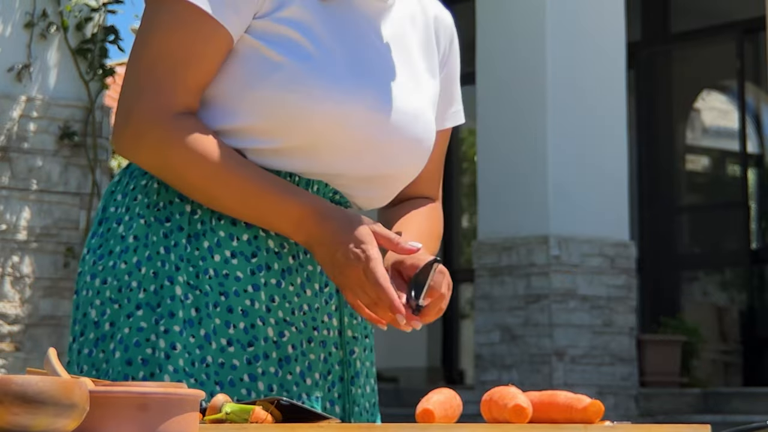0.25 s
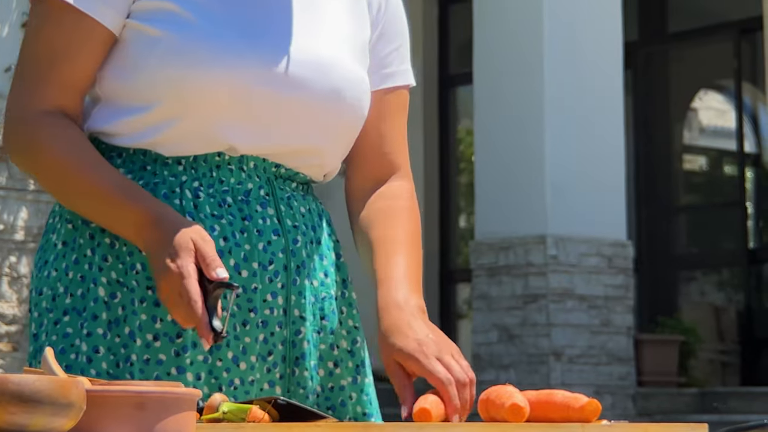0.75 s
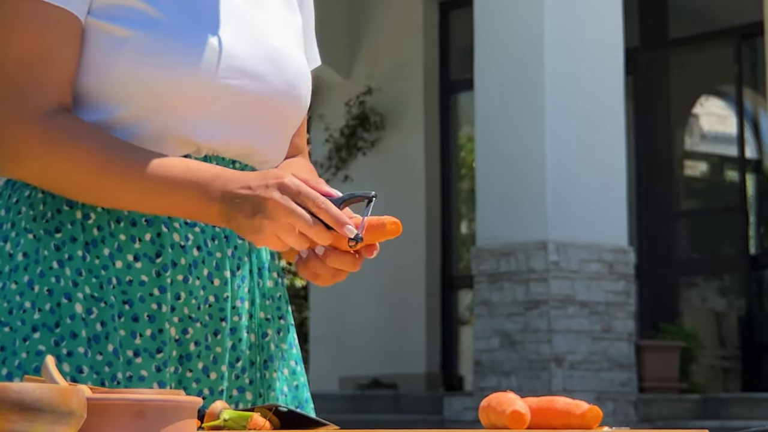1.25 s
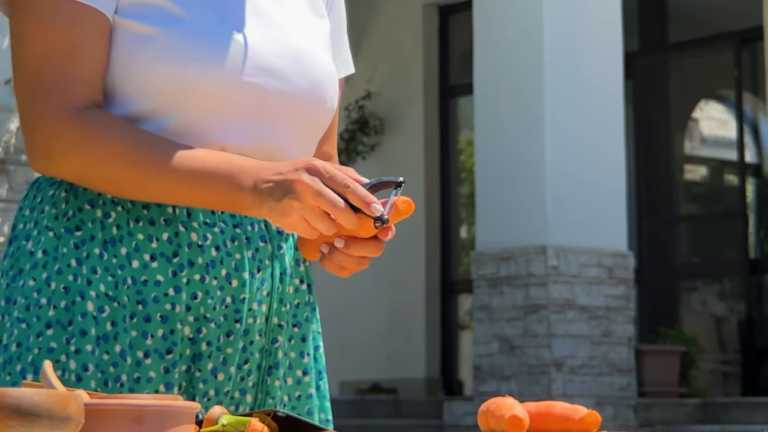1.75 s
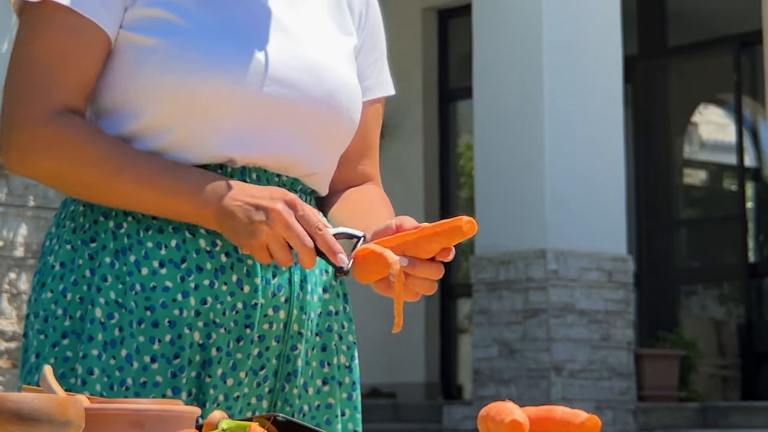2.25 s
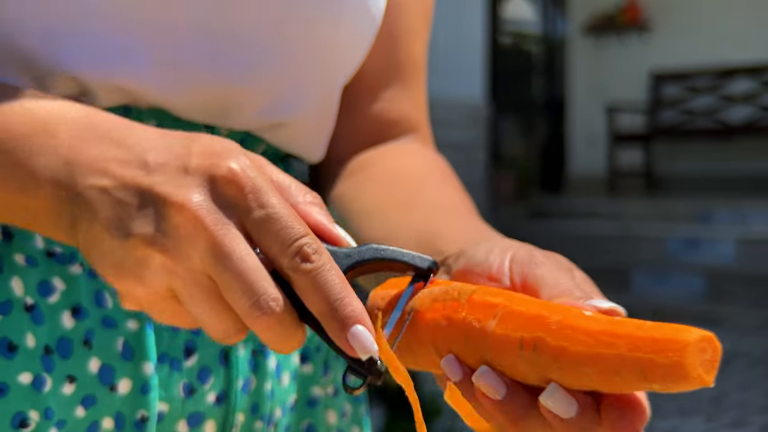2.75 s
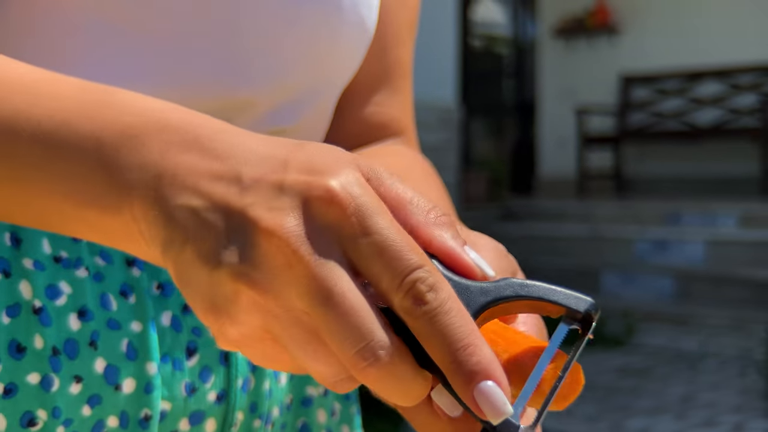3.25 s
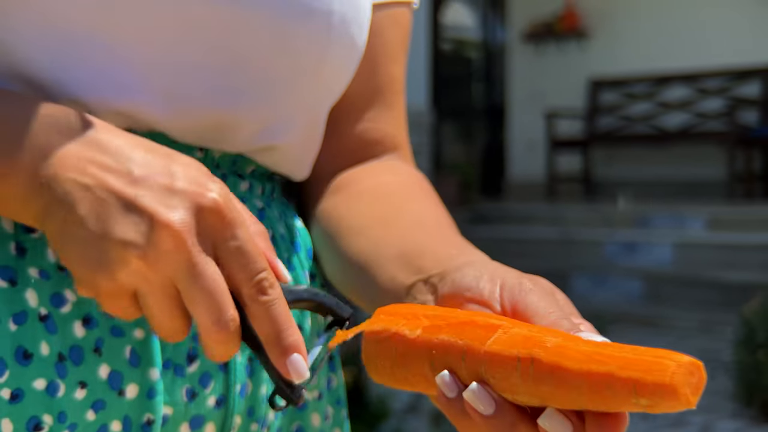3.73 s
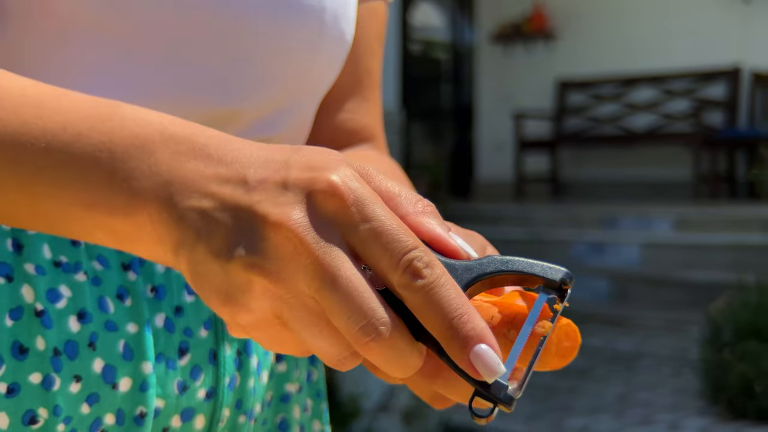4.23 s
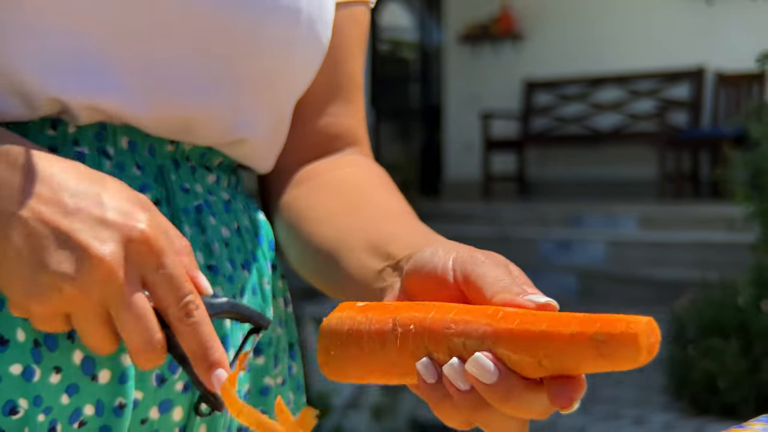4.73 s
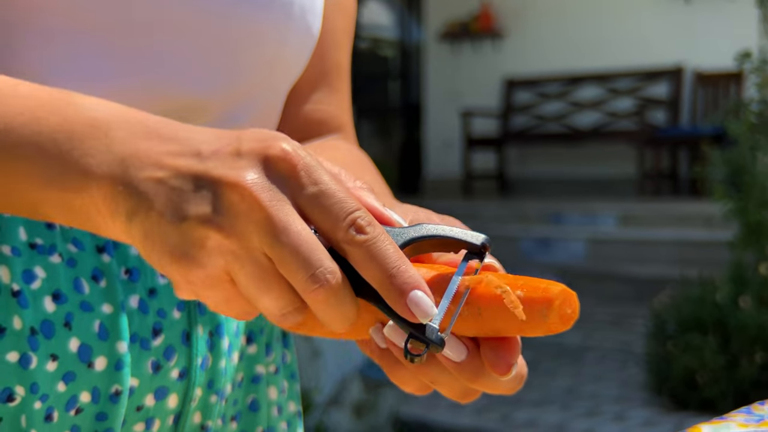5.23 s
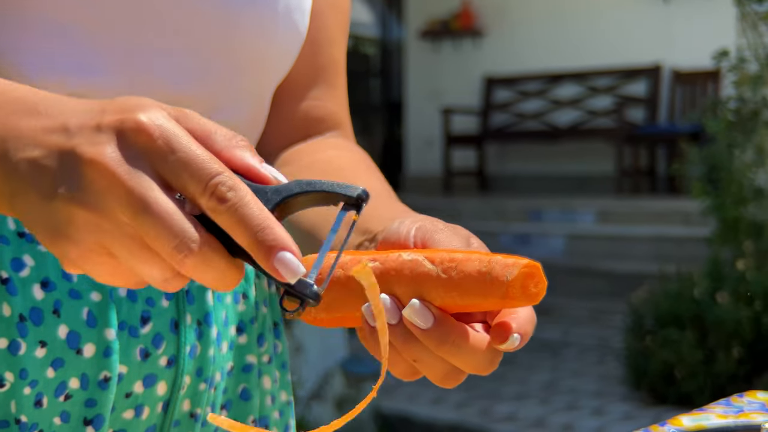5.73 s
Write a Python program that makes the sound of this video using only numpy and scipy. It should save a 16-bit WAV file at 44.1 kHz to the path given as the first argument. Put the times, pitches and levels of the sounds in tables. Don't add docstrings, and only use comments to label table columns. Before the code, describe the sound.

Crisp, dry scrapes of a swivel peeler on a carrot with sharp plastic and metal clacks, after low wind buffeting and distant twitters in open air.

```python
import sys
import numpy as np
from scipy import signal
from scipy.io import wavfile
from scipy.ndimage import uniform_filter1d

SR = 44100
rng = np.random.default_rng(int(sys.argv[2]) if len(sys.argv) > 2 else 0)


def linear_from_db(decibels):
    return 10 ** (np.asarray(decibels, float) / 20)


def dump(signal):
    limited = np.clip(np.atleast_2d(signal).T, -1, 1)
    pcm = np.round(limited * 32767).astype(np.int16)
    wavfile.write(sys.argv[1], SR, pcm)


N = 263718


def rms_one(x):
    return x / np.sqrt(np.mean(x ** 2) + 1e-20)


def in_time(tables, silent_db=-130):
    t, out = np.arange(N) / SR, None
    for rows in tables:
        s, *columns = np.transpose(rows)
        curves = np.array([np.interp(t, s, c) for c in columns])
        inside = (t >= s[0]) & (t <= s[-1])
        out = np.where(inside, curves, silent_db if out is None else out)
    return out


def drift(rate_hz):
    r = np.exp(-80 * np.pi * rate_hz / SR)
    slow = signal.lfilter([1], [1, -2 * r, r * r], rng.standard_normal(N // 40 + 2002))[2000:]
    return np.interp(np.arange(N) / 40, np.arange(len(slow)), rms_one(slow))


def band(x, low_hz, high_hz, order=2):
    edges = [low_hz, min(high_hz, .45 * SR)]
    return signal.sosfilt(signal.butter(order, edges, "band", fs=SR, output="sos"), x)


def resonate(x, hz, width_hz):
    r = np.exp(-np.pi * width_hz / SR)
    top = np.array([1, 0, -1]) * (1 - r * r) / 2
    return signal.lfilter(top, [1, -2 * r * np.cos(2 * np.pi * hz / SR), r * r], x + 1e-18)


def modes_rms(modes):
    return np.sqrt(sum(linear_from_db(2 * db) * np.pi * w / SR for hz, w, db in modes))


def body(x, modes, wander_db):
    out = 0
    for k, (hz, w, db) in enumerate(modes):
        out = out + (-1) ** k * linear_from_db(db + wander_db * drift(12)) * resonate(x, hz, w)
    return out / modes_rms(modes)


def slide(x, modes, bend, wander_db):
    out = 0
    for k, (hz, w, db) in enumerate(modes):
        moving_hz = hz * (bend + 0.019 * drift(8.2))
        turn = np.exp(2j * np.pi * np.cumsum(moving_hz) / SR)
        r = np.exp(-1.5 * np.pi * w / SR)
        rung = turn * signal.lfilter([(1 - r) ** 2], [1, -2 * r, r * r], x / turn)
        out = out + (-1) ** k * linear_from_db(db + wander_db * drift(21)) * 2 * rung.real
    return out / modes_rms(modes)


# f/Hz, level/dB (per Hz)
AIR_COLOUR = [(140, -9), (400, -11.5), (800, -13.5), (1140, -18), (2280, -25), (4500, -28), (9000, -35),
              (12900, -38)]
# f/Hz, width/Hz, level/dB (relative)
DRONES = [(50.7, 17, -4), (124.2, 12, -11.5), (170.7, 3.8, -25), (292, 39, -20)]
HUSH_DB, HUSH_FADE_DB_PER_S = -68, 0.22


def hush():
    out, edges, white = 0, 120 * 2 ** np.arange(0, 7.6, .5), rng.standard_normal((2, N))
    hz, db = np.transpose(AIR_COLOUR)
    for k, (low, high) in enumerate(zip(edges, edges[1:])):
        level_db = np.interp(np.log(low * high) / 2, np.log(hz), db) + 2.5 * drift(2.6)
        out = out + linear_from_db(level_db) * band(white[k % 2], low, high)
    out = rms_one(out)
    for hz, w, db in DRONES:
        out = out + linear_from_db(db) * rms_one(resonate(resonate(white[0], hz, w), hz, 2 * w))
    out = signal.sosfilt(signal.ellip(8, .5, 40, 12800, fs=SR, output="sos"), out)
    for low in (12900, 13600, 14300, 15000):
        flicker = uniform_filter1d(1. * (drift(9) > low / 14000 - .3), 400)
        out = out + linear_from_db(-28.5) * flicker * rms_one(band(white[1], low, low + 700, order=4))
    t = np.arange(N) / SR
    gust = 1 + 0.53 * np.exp(-t / 0.0064)
    return linear_from_db(HUSH_DB - HUSH_FADE_DB_PER_S * t) * gust * out


# t/s, level/dB
GUSTS = [
    [(0.0, -48.5), (0.386, -37), (0.406, -31.5), (0.664, -47.5), (0.832, -46.5), (0.9, -43.5),
     (1.072, -44.5), (1.168, -44.5), (1.25, -52)],
    [(1.25, -62.5), (1.374, -47.5), (1.714, -54.5), (1.898, -54.5), (2.028, -50), (2.184, -41), (2.37, -50),
     (2.416, -47), (2.62, -55)],
    [(5.2, -72), (5.3, -63), (5.38, -73), (5.47, -66), (5.54, -64)],
]
BUFFET_DB, BUFFET_FOLLOWS = 17, 1
QUIET_DB, QUIET_BUFFET_DB, QUIET_SURGE_DB = -65, -46.5, -7
START_PUSH_DB, START_PUSH_S = -31, 0.03


def wind():
    t, first_db = np.arange(N) / SR, GUSTS[0][0][1]
    rumble_db = uniform_filter1d(in_time(GUSTS, silent_db=QUIET_DB)[0], size=2000)
    buffet_db = BUFFET_DB + first_db + BUFFET_FOLLOWS * (rumble_db - first_db)
    buffet_db = np.maximum(buffet_db, QUIET_BUFFET_DB)
    white = rng.standard_normal((4, N + SR))
    buffet = rms_one(band(white[0], 2.914, 11.5, order=3)[SR:])
    rumble = rms_one(band(white[1], 28, 62.3)[SR:])
    flutter = rms_one(band(white[2], 29, 148)[SR:]) * linear_from_db(0.5 * drift(36))
    surge = rms_one(band(white[3], 9.6, 28)[SR:])
    rumble = rumble / np.sqrt(uniform_filter1d(rumble ** 2, 3000) + 2)
    buffet = buffet / np.sqrt(uniform_filter1d(buffet ** 2, 9000) + 0.72)
    push = linear_from_db(START_PUSH_DB) * np.exp(-t / START_PUSH_S)
    surge = linear_from_db(QUIET_SURGE_DB * (t > GUSTS[1][-1][0])) * surge
    fast = linear_from_db(-13) * rumble + surge + linear_from_db(-23.5) * flutter
    return push + linear_from_db(buffet_db - 0.7) * buffet + linear_from_db(rumble_db + 2.5 * drift(7.4)) * fast


PHRASE_PEAK, PHRASE_IN_DB, PHRASE_OUT_DB = .4, -5, -7


def phrase(s, length, start_hz, end_hz, db):
    peak_hz = start_hz + PHRASE_PEAK * (end_hz - start_hz)
    return [(s, start_hz, db + PHRASE_IN_DB),
            (s + PHRASE_PEAK * length, peak_hz, db),
            (s + length, end_hz, db + PHRASE_OUT_DB)]


BIRD_FAR_DB = 4


def bird(rows, trill_db, blur_hz):
    hz, level_db = in_time([phrase(*row) for row in rows])
    hz = uniform_filter1d(np.maximum(hz, 2000), 100) * (1 + 0.047 * drift(62))
    phase = 2 * np.pi * np.cumsum(hz) / SR
    tone = drift(blur_hz) * np.sin(phase) + drift(blur_hz) * np.cos(phase)
    song = uniform_filter1d(linear_from_db(level_db - BIRD_FAR_DB), 600) * linear_from_db(trill_db * drift(23)) * tone
    lags = (SR * np.array([.011, .027, .048, .081, .12])).astype(int)
    return song + sum(linear_from_db(-5 - 2.5 * k) * np.roll(song, lag) for k, lag in enumerate(lags))


# t/s, length/s, start f/Hz, end f/Hz, level/dB
HIGH_BIRD = [
    (.32, 0.2, 5810, 5120, -72.5),
    (.85, 0.22, 5760, 5390, -72.5),
    (1.3, 0.21, 6080, 5010, -73),
    (1.75, .06, 6000, 5600, -77.5),
    (2.42, .12, 5900, 5400, -74.5),
    (3.89, 0.15, 6000, 5730, -71.5),
    (4.045, .03, 5240, 5600, -65.5),
    (4.145, .025, 5150, 5230, -67),
    (4.735, .055, 6300, 5250, -66),
    (4.86, 0.078, 5250, 4760, -70),
]
LOW_BIRD = [
    (.2, 0.085, 3590, 2920, -72),
    (.355, 0.046, 4410, 4310, -68),
    (1.05, 0.16, 3860, 2855, -70.5),
    (4.085, 0.068, 3100, 3050, -64.5),
]


def birds():
    return bird(HIGH_BIRD, trill_db=4, blur_hz=200) + linear_from_db(-3) * bird(LOW_BIRD, trill_db=3, blur_hz=250)


# t/s, length/s, start f/Hz, end f/Hz, level/dB
CHIRPS = [
    (2.385, 0.033, 4200, 2800, -71),
    (2.4, 0.0062, 2200, 5700, -74),
    (2.412, 0.014, 5200, 1900, -67),
    (3.925, 0.017, 4900, 9200, -75),
    (3.94, 0.021, 2900, 6900, -70),
    (4.035, 0.039, 1800, 5500, -74.5),
    (4.03, 0.011, 4900, 6800, -78),
    (4.07, 0.013, 4100, 3600, -72),
    (0.28, .03, 3000, 3600, -90),
]


def chirps():
    out = np.zeros(N)
    for s, length, start_hz, end_hz, db in CHIRPS:
        i, size = round(s * SR), round(length * SR)
        phase = 2 * np.pi * np.cumsum(np.linspace(start_hz, end_hz, size)) / SR
        out[i:i + size] += linear_from_db(db) * np.hanning(size) ** .5 * np.sin(phase)
    return out * linear_from_db(3.7 * drift(150))


# t/s, peak level/dB, f/Hz, click level/dB, thud level/dB (both relative)
BUMPS = [
    (0.767, -54, 1030, 2, -10),
    (0.772, -51.5, 940, -25, -3),
    (0.776, -54.5, 426, -19, -28),
    (0.779, -53, 970, -19, -13),
    (0.787, -55.5, 966, -15, -22),
    (2.857, -65, 570, 29, -1),
    (4.212, -61, 970, -7, -4),
    (4.825, -61, 566, -9, 4),
    (5.761, -60.5, 1300, -7, -18),
]
BUMP_T60_S = 0.025


def bumps():
    out, t = np.zeros(N + 4000), np.arange(4000) / SR
    rough = rng.standard_normal((len(BUMPS), 4000))
    for (s, peak_db, hz, click_db, thud_db), noise in zip(BUMPS, rough):
        thump = 2 * np.sin(2 * np.pi * hz * t) + 0.46 * rms_one(band(noise, .5 * hz, 2 * hz, order=1))
        click = linear_from_db(click_db - 60 * t / 0.0022) * rms_one(band(noise, 650, 3200))
        thud = linear_from_db(thud_db + 30 * t / BUMP_T60_S) * np.sin(2 * np.pi * 300 * t)
        fade = linear_from_db(peak_db - 60 * t / BUMP_T60_S) * np.minimum(t / 0.00042, 1)
        i = round(s * SR)
        out[i:i + 4000] += fade * (thump + click + thud)
    return out[:N]


# t/s, f/Hz, level/dB, t60/s
SINGING = [
    (.603, 12800, -84, .25),
    (2.343, 13000, -79, .25),
    (3.010, 13700, -64, 0.27),
    (3.010, 11500, -73, 0.18),
    (4.812, 12700, -61, 0.13),
    (5.545, 13100, -80, 0.32),
    (5.724, 11570, -57.5, 0.21),
    (5.724, 12750, -69, 0.19),
    (5.724, 13700, -66, 0.24),
]


def singing():
    out, t = np.zeros(N + SR // 2), np.arange(SR // 2) / SR
    for s, hz, db, t60 in SINGING:
        i = round(s * SR)
        out[i:i + SR // 2] += linear_from_db(db - 60 * t / t60) * np.sin(2 * np.pi * hz * t)
    return out[:N] * linear_from_db(2.7 * drift(40))


# t/s, f/Hz, peak level/dB, rise/ms, t60/ms
RINGS = [(.306, 6970, -60.5, 2, 45), (.308, 5970, -69, 2, 40), (.311, 4480, -63, 2, 40),
         (.355, 4370, -66, 2, 50), (.378, 4300, -66, 2, 30), (.483, 6570, -64, 2, 30),
         (.55, 3700, -59, 2.2, 38), (.55, 6500, -62, 1.5, 20), (.577, 2120, -60, 2, 40),
         (.6, 1960, -52, 2, 48), (.601, 6380, -59, 2, 40), (2.8533, 3540, -39, 1.4, 16),
         (3.009, 3800, -40.5, 1.8, 14), (3.2698, 3594, -25.5, 3.8, 10.5), (3.2705, 1960, -36, 2.5, 13),
         (3.765, 7010, -51.5, 2.3, 30), (4.2005, 1310, -50, 1.5, 6.6), (4.204, 1150, -47, 0.47, 7),
         (4.808, 3500, -40.5, 3.6, 12), (4.8095, 2060, -49, 1.6, 28), (4.8178, 3500, -44, 1.3, 8.9),
         (5.0785, 2810, -34, 2, 12), (5.078, 1820, -42.5, 3.5, 20), (5.0801, 8940, -23, 0.89, 12),
         (1.445, 7450, -50, 1.6, 17), (5.542, 6300, -56, 2, 25), (5.542, 4270, -56, 1.8, 25),
         (5.577, 4230, -62, 1.5, 20), (5.577, 6350, -61, 1.5, 20), (4.864, 3600, -60, 1.5, 13),
         (4.87, 3500, -63, 1.5, 15), (5.7645, 4000, -54, 1.5, 14), (5.931, 1834, -48.5, 3.5, 16),
         (5.931, 2770, -47, 2.9, 15)]
# t/s, peak level/dB, rise/ms, t60/ms
HANDLE_RINGS = [(3.009, -55, 1.4, 15), (3.05, -53, 2, 30), (3.2658, -41.5, 2, 16), (3.765, -56, 2, 25),
                (4.177, -54, 2.5, 20), (5.7238, -51, 1.5, 12), (5.7285, -46.5, 1.8, 13),
                (5.7392, -53, 1.6, 13), (5.746, -51, 1.5, 13), (5.77, -66, 3, 71), (5.959, -52, 1.4, 14)]
HANDLE_HZ = 1960


def rings():
    out, t = np.zeros(N + 3000), np.arange(3000) / SR
    rows = RINGS + [(s, HANDLE_HZ, *rest) for s, *rest in HANDLE_RINGS]
    for (s, hz, db, rise_ms, t60_ms), start in zip(rows, rng.random(len(rows))):
        rise = max(rise_ms, .3) / 1000
        swell = np.sin(np.pi / 2 * np.minimum(t / rise, 1)) ** 2
        decay = linear_from_db(-60000 * np.maximum(t - rise, 0) / t60_ms)
        i = round(s * SR)
        out[i:i + 3000] += linear_from_db(db) * swell * decay * np.sin(2 * np.pi * (hz * t + start))
    return out[:N] * linear_from_db(1.5 * drift(200))


# t/s, peak level/dB, lowest f/Hz, highest f/Hz, t60/ms
SNAPS = [(2.295, -58, 6000, 15500, 11), (2.876, -54, 800, 3000, 23), (2.882, -53, 900, 5000, 25),
         (2.884, -44.5, 900, 4940, 19), (2.8888, -40, 910, 3330, 23), (2.89, -36, 890, 3000, 19),
         (2.894, -55, 1000, 3600, 25), (2.707, -45, 1400, 4600, 10), (4.311, -47, 2500, 4200, 10),
         (4.451, -50, 1210, 2400, 12), (5.221, -49, 2500, 4220, 12), (2.923, -56, 1000, 3980, 11),
         (3.2604, -38.5, 1210, 4900, 12), (4.2135, -30, 1200, 14000, 6.6), (4.8438, -47, 1000, 4500, 10),
         (5.3256, -33.5, 1320, 4600, 4.4), (5.873, -49.5, 1100, 2230, 25)]


def snaps():
    out, t = np.zeros(N), np.arange(800) / SR
    for (s, db, low_hz, high_hz, t60_ms), noise in zip(SNAPS, rng.standard_normal((len(SNAPS), 800))):
        burst = band(noise * linear_from_db(-60000 * t / t60_ms), low_hz, high_hz)
        i = round(s * SR)
        out[i:i + 800] += linear_from_db(db) * burst / np.abs(burst).max()
    return out


# t/s, peak level/dB, low level/dB (relative), chatter/ms
HANDLING = [(0.302, -55, -7, 4.9), (0.3115, -53.5, -5, 12), (0.357, -56, 2, 7.9), (0.377, -59, -3, 8.3),
            (0.423, -61, 4, 14), (0.436, -58, 1, 7), (0.476, -57, 2.5, 14), (0.491, -62, 2, 20),
            (0.549, -58, 3, 27), (0.572, -59, 3, 13), (0.6, -53.5, 0.5, 16)]
HANDLING_BRIGHT_DB, HANDLING_EDGE_DB = 1, -4.5
# t/s, peak level/dB, bright level/dB, edge level/dB (both relative), chatter/ms
KNOCKS = [(3.0087, -38.5, -4, -9, 6.9), (3.0496, -39.5, -2, -13, 4.4), (3.055, -45, -16, -13, 3.6),
          (3.0595, -53, -15, -7, 4.7), (3.2648, -31, 0.5, -0.5, 9.1), (3.27, -25, 2, 2.5, 5.7),
          (3.767, -40, -0.5, -12, 5.2), (3.889, -40, 2, -7, 10.6), (4.1761, -30, -1.5, -8, 3.8),
          (4.216, -40, -2, -15, 2.5), (4.6907, -39.5, 0.5, -5, 13.3), (4.812, -42, -14, -4, 19.5),
          (4.818, -30.5, -2.5, -6, 4.4), (5.0752, -26, -3, 5, 3.2), (5.0785, -28, 10, 5, 2.4),
          (5.081, -28, -2, 9, 1.2), (5.082, -36, 3, 0, 2), (5.542, -41.5, -5, -12, 8.3),
          (5.72, -46, -7, -7, 3), (5.7232, -33.5, -5, -9, 3.6), (5.7284, -30, -8, -23, 2.8),
          (5.7335, -45, -5, -5, 5), (5.7379, -33, -7, -11, 3.3), (5.7448, -38.5, -3, -4, 5.2),
          (5.954, -49, -1.5, -9, 4), (5.9588, -33.5, 5, 0, 1.3)]
KNOCK_LOW_DB = -11
SLAPS = [
    (1.4387, -53.5, -1, 2, 11),
    (1.4456, -38, -9.5, -10, 5.3),
    (2.315, -50.5, -9, -10, 7.8),
    (2.343, -57.5, 0, -3, 7),
    (2.8497, -36, 0, -6, 2),
    (2.8533, -38, -6, -9, 3.4),
    (3.2724, -24.5, -10.5, 1, 4.3),
    (4.6636, -34, -1, -1, 2.8),
    (4.8078, -30, 0.5, 3.5, 3.2),
    (5.9294, -27, -5.5, -4, 4.2),
]
SLAP_LOW_DB = -14
# t/s, peak level/dB, low level/dB (relative), chatter/ms
TICKS = [(2.5, -52.5, -3, 6.7), (2.98, -60.5, -1, 15), (3.0038, -46, -17, 2.7), (3.0144, -39, -10, 5.1),
         (3.0256, -43, -18, 3.5), (3.02, -47, -11, 1.6), (3.0285, -48, -14, 2), (3.032, -45, -14, 5),
         (3.0385, -53, -10, 2.5), (3.0438, -50, -16, 2.8), (3.221, -60.5, 9, 8.3), (3.296, -49, -12, 18),
         (3.3136, -50, -8, 20), (3.7582, -47, -3, 3.9), (3.861, -60, 0, 19), (3.9564, -55, -12, 9.9),
         (3.996, -50.5, -6, 4.3), (4.188, -47, -4, 3.4), (4.2352, -41.5, -1, 2), (4.7222, -50.5, 2, 6.4),
         (4.7952, -46, -4, 11), (4.8852, -47.5, -2.5, 7.3), (4.9406, -51.5, -5.5, 17), (4.99, -56, -1, 3.6),
         (5.092, -41, -5.5, 9.2), (5.1105, -43, -3, 3), (5.576, -57, 2, 3.8), (5.699, -59, -20, 4.4),
         (5.7112, -57, -21, 2.5), (5.754, -41, -6, 3.9), (5.759, -44, -6.5, 4), (5.844, -52.5, -13, 6.3),
         (5.909, -58, -1, 5), (5.919, -48, -16, 4.2), (5.942, -54, -9, 12)]
TICK_BRIGHT_DB, TICK_EDGE_DB = -7.5, -10


def contacts():
    return ([(s, db, low, HANDLING_BRIGHT_DB, HANDLING_EDGE_DB, ms / 1000) for s, db, low, ms in HANDLING]
            + [(s, db, KNOCK_LOW_DB, bright, edge, ms / 1000) for s, db, bright, edge, ms in KNOCKS]
            + [(s, db, SLAP_LOW_DB, bright, edge, ms / 1000) for s, db, bright, edge, ms in SLAPS]
            + [(s, db, low, TICK_BRIGHT_DB, TICK_EDGE_DB, ms / 1000) for s, db, low, ms in TICKS])


# f/Hz, width/Hz, level/dB
KNOCK_LOW = [(1686, 60, -20), (1910, 450, -17.5)]
KNOCK_FRAME = [(2600, 1100, -17.5), (3667, 240, 8), (4230, 330, -14), (4294, 350, -1)]
KNOCK_BRIGHT = [(5775, 210, -4.5), (6300, 920, -6), (7500, 2500, -16)]
KNOCK_EDGE = [(8634, 340, -1.5), (9140, 307, 0), (12700, 740, -9.5), (13700, 950, -8), (14900, 3500, -13.5)]
RATTLE_RISE_S = 0.0006
LOW_LAG_S = 0.0012


def rattles():
    low, frame, bright, edge = np.zeros((4, N))
    rows, size = contacts(), 1500
    luck = rng.random((len(rows), 3, size))
    t = np.arange(size) / SR
    for (s, peak_db, low_db, bright_db, edge_db, length), (born, big, sign) in zip(rows, luck):
        swell = np.minimum(0.33 + t / RATTLE_RISE_S, 1) * np.exp(-(t / np.clip(length, .0005, .03)) ** 2)
        swell = swell + linear_from_db(-14 - 60 * t / 0.019)
        ticks = (born < 7000 / SR) * big ** 3 * np.sign(sign - .5)
        ticks[0] = 1
        ticks = ticks * swell
        i = round(s * SR)
        ticks = linear_from_db(peak_db + 9.5) * ticks[:N - i] / np.sqrt(np.sum(ticks ** 2)) * np.sqrt(length / 0.0052)
        frame[i:i + size] += ticks
        low[i:i + size] += linear_from_db(low_db) * ticks
        bright[i:i + size] += linear_from_db(bright_db) * ticks
        edge[i:i + size] += linear_from_db(edge_db) * ticks
    low = np.roll(low, round(LOW_LAG_S * SR))
    parts = zip((low, frame, bright, edge), (KNOCK_LOW, KNOCK_FRAME, KNOCK_BRIGHT, KNOCK_EDGE))
    return sum(body(x, modes, wander_db=-1) for x, modes in parts)


def grains(per_s, spread_db):
    sizes = linear_from_db(spread_db * np.minimum(rng.exponential(1, N), 5)) * rng.choice([-1, 1], N)
    return rms_one(sizes * (rng.random(N) < per_s / SR))


# t/s, pressure level/dB, speed (0-1)
STROKES = [
    [(1.72, -91, 0.3), (1.78, -72, 0.4), (1.85, -66, 0.5), (1.95, -69, .35), (2.04, -73, 0.53),
     (2.12, -66, 0.5), (2.28, -63, 0.5), (2.31, -78, 0.7)],
    [(2.54, -67, 0.05), (2.586, -54.5, 0.62), (2.7, -51, 0.68), (2.826, -54, 0.76), (2.836, -70, 0.5)],
    [(3.35, -78, 0.6), (3.4, -53.5, 0.5), (3.47, -53, 0.6), (3.5, -52.5, 0.83), (3.6, -51, 0.74),
     (3.724, -53.5, 0.86), (3.735, -63, 0.7)],
    [(4.215, -71, 0.1), (4.275, -54.5, 0.47), (4.47, -53, 0.61), (4.665, -52, 0.64), (4.68, -81, 0.9)],
    [(5.098, -64, 0.34), (5.194, -54, 0.46), (5.35, -51, 0.53), (5.512, -57.5, 0.92), (5.524, -62, 0.9)],
]
# f/Hz, width/Hz, level/dB
LOW_MODES = [(1570, 246, 0), (2053, 182, 3)]
FRAME_MODES = [(3158, 316, 2), (3500, 273, 3), (4290, 1230, -12.5)]
BRIGHT_MODES = [(4660, 280, -17), (5720, 86, 9.5), (6630, 590, 6.5), (6750, 250, -11), (8600, 1600, 4)]
SIZZLE_MODES = [(11870, 1300, -2), (14000, 1800, 6), (15150, 6200, -5)]
BITE_SLOW_DB, BITE_FAST_DB = -15.5, -4
SIZZLE_SLOW_DB, SIZZLE_FAST_DB = -26, 4.5
BODY_DB, BODY_ENDS_DB, FAR_BODY_DB = -13.5, -3.5, -2
BODY_LATE_DB = -1
BRIGHT_CLIMB, FRAME_CLIMB = 0.033, .025


def scrape():
    press_db, speed = in_time(STROKES)
    speed, t = np.clip(speed, 0, 1.2), np.arange(N) / SR
    ends = [rows[k][0] for rows in STROKES for k in (0, -1)]
    along = np.interp(t, ends, [-1, 1] * len(STROKES))
    far = t < STROKES[1][0][0]
    low_db = BODY_DB + BODY_ENDS_DB * along ** 2 + BODY_LATE_DB * along + FAR_BODY_DB * far
    bite_db = BITE_SLOW_DB + (BITE_FAST_DB - BITE_SLOW_DB) * speed
    sizzle_db = SIZZLE_SLOW_DB + (SIZZLE_FAST_DB - SIZZLE_SLOW_DB) * speed
    press = uniform_filter1d(linear_from_db(press_db), 200) * linear_from_db(0.83 * drift(60) + 1.4 * drift(150))
    tear = grains(4500, spread_db=1.5) * press
    spray = grains(9000, spread_db=3.5) * press
    direct = rms_one(band(rng.standard_normal(N), 3700, 8000)) * press
    frame = slide(tear, FRAME_MODES, 1 + FRAME_CLIMB * along, wander_db=-0.5)
    carrot = slide(tear, LOW_MODES, 0.98, wander_db=3)
    bite = slide(tear, BRIGHT_MODES, 1 + BRIGHT_CLIMB * along, wander_db=2.5) + direct
    sizzle = body(spray, SIZZLE_MODES, wander_db=2.5)
    return frame + linear_from_db(low_db + 3) * carrot + linear_from_db(bite_db - 2) * bite + linear_from_db(sizzle_db + 1.5) * sizzle


# at stroke start/ms, at stroke end/ms
ECHO_MS = (0.866, 0.76)


def close_echo(x):
    n = np.arange(N)
    ends = [(rows[0][0], rows[-1][0]) for rows in STROKES]
    lag = np.interp(n / SR, np.ravel(ends), list(ECHO_MS) * len(ends)) * SR / 1000
    return x + linear_from_db(-11) * band(np.interp(n - lag, n, x), 4000, 8000, order=1)


def scene():
    background = hush() + wind() + birds() + chirps()
    work = bumps() + singing() + rings() + snaps() + rattles() + close_echo(scrape())
    return (background + work)[None]


def roll_off(x):
    return signal.sosfilt(signal.butter(12, 16560, fs=SR, output="sos"), x)


def record(dry):
    mix = signal.sosfilt(signal.ellip(10, .5, 60, 15950, fs=SR, output="sos"), dry)
    return roll_off(mix)


dry = scene()
out = record(dry)
dump(out)
```